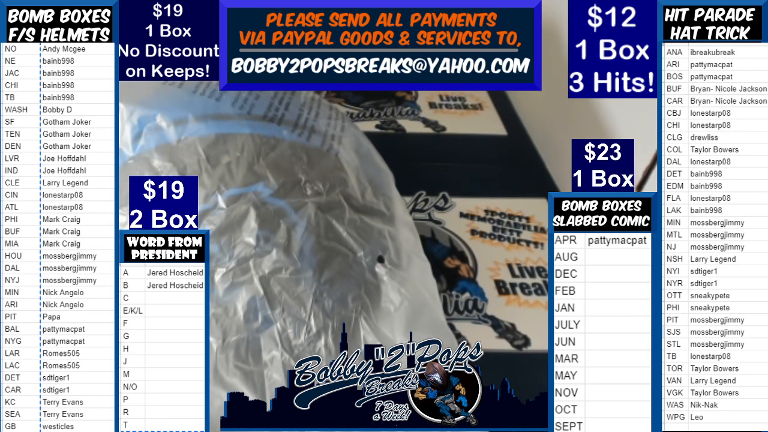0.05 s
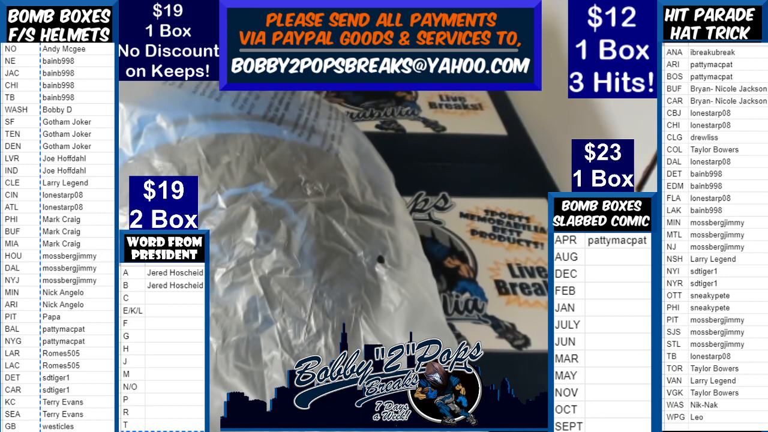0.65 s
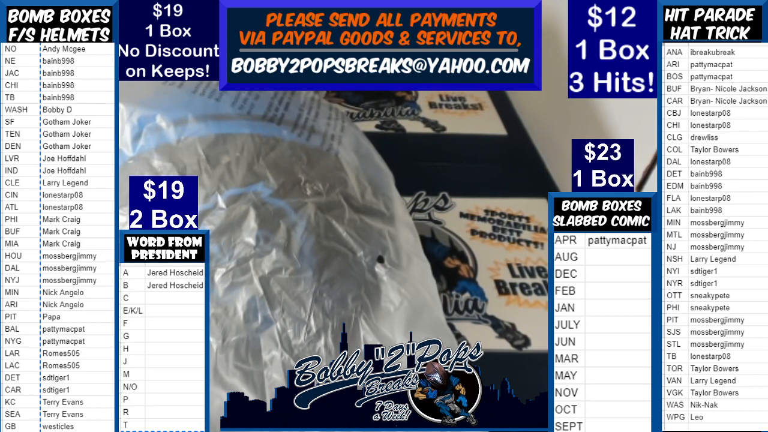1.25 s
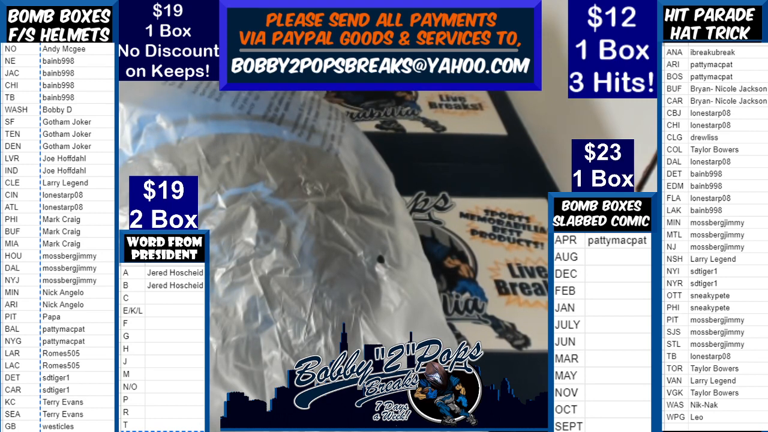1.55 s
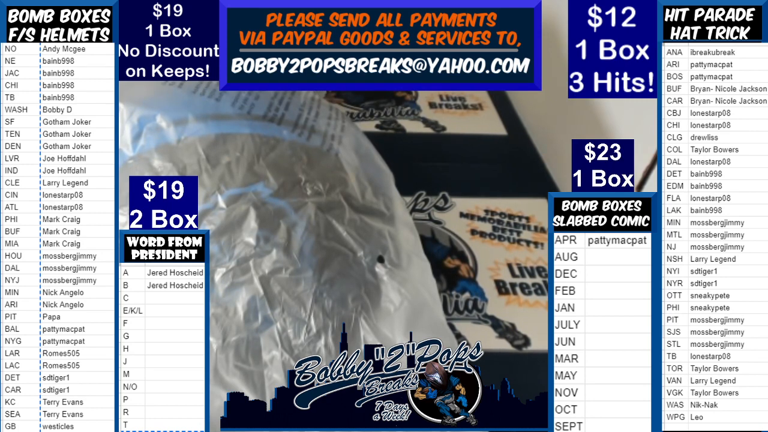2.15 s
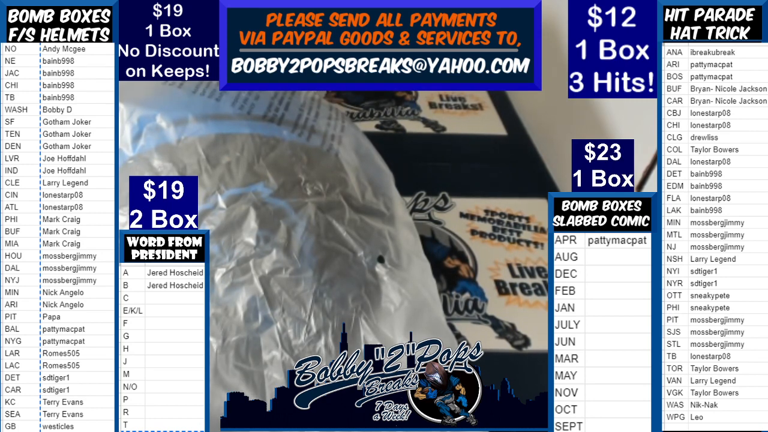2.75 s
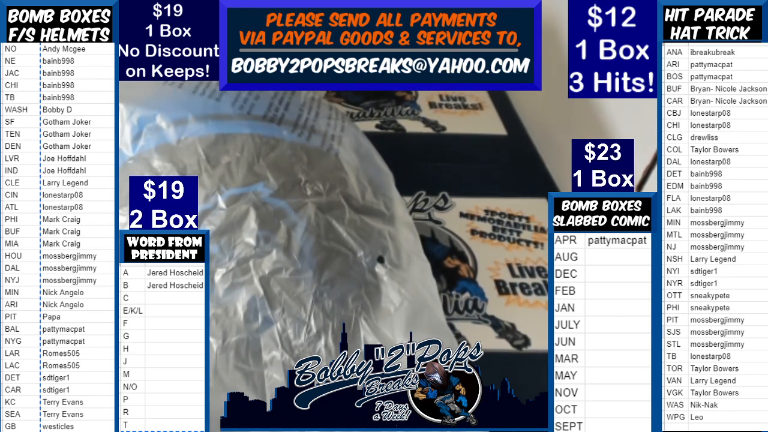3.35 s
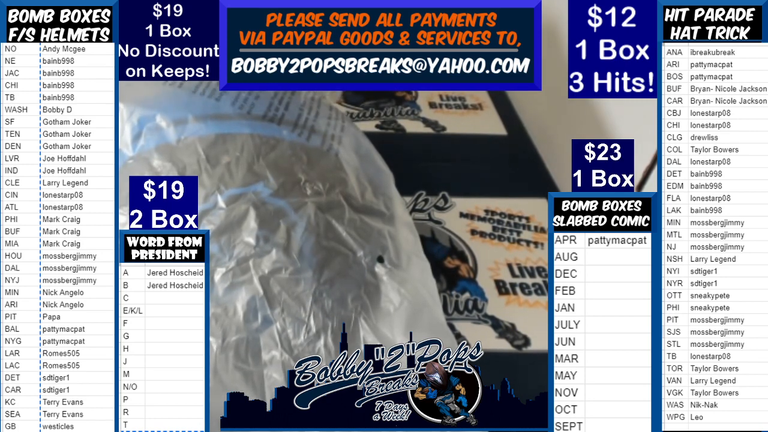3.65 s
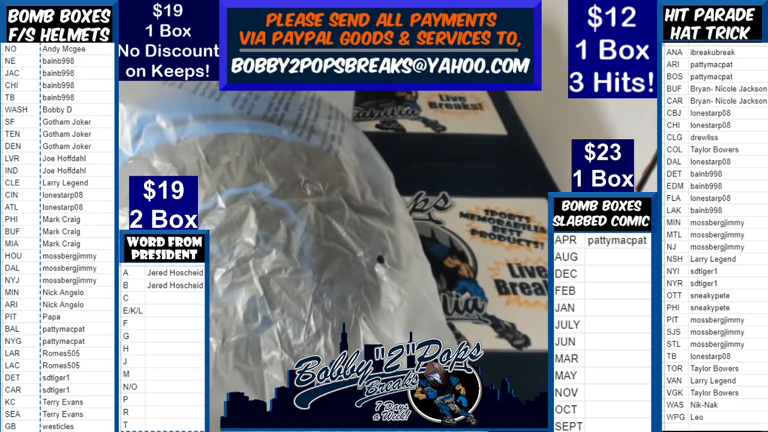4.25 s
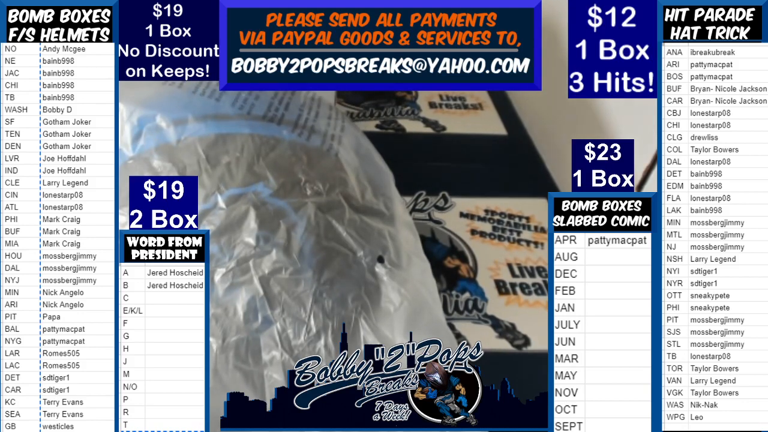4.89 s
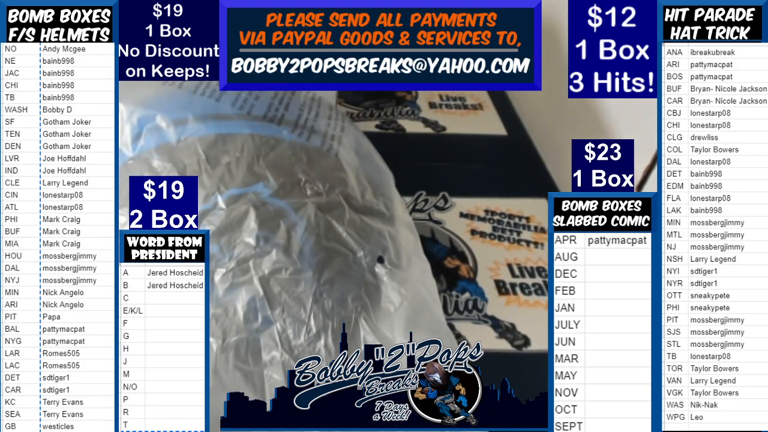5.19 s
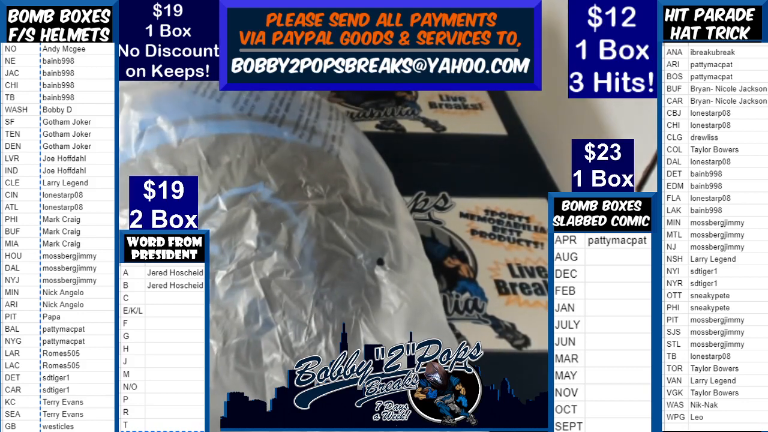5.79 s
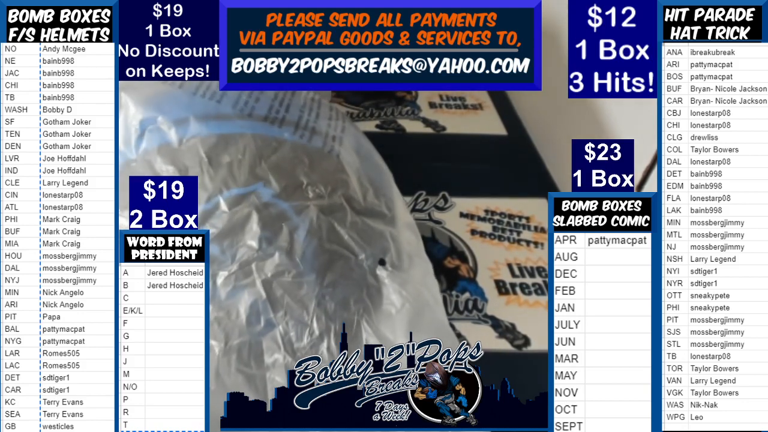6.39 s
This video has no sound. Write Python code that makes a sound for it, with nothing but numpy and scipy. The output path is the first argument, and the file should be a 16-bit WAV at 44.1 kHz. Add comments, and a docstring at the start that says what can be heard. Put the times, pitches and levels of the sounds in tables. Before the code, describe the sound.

Packing tape screeches off the roll in one short, loud, slightly distorted pull. After that, plastic wrap crinkles, snaps and slides in quieter, scattered bursts while a cardboard box is bumped on a desk. Late on come a cluster of sharp cracks, a brief tape twang and a few short scuffs. The microphone is close, in a small room with a faint fan.

```python
"""Taping up a cardboard box

Close to a mono microphone in a small room with a fan, packing tape sticks and slips, screeching
off the roll and overloading the input. Plastic wrap crinkles and slides, its folds buckling in
clicks. The box is bumped and shifted on the desk, ringing its panels; the tape cracks and twangs."""
import sys
import numpy as np
from scipy import signal
from scipy.io import wavfile
from scipy.ndimage import uniform_filter1d

SR = 44100
rng = np.random.default_rng(int(sys.argv[2]) if len(sys.argv) > 2 else 0)


def persist_wave(psi):
    """Save psi, clipped to +-1, as 16-bit WAV."""
    counts = np.round(np.clip(psi, -1, 1) * 32767).astype(np.int16)
    wavfile.write(sys.argv[1], SR, np.atleast_2d(counts).T)


N = 283563
TIME = np.arange(N) / SR


def amp(db):
    """Decibels to gain."""
    return 10 ** (np.asarray(db) / 20)


def unit(x):
    """Scales to rms 1."""
    return x / np.sqrt(np.mean(x ** 2) + 1e-20)


def read(points, hz):
    """Reads a curve on a log-frequency axis."""
    f, value = np.transpose(points)
    return np.interp(np.log(hz + 1), np.log(f + 1), value)


def add(mix, s, sound):
    """Mixes a sound in at time s."""
    part = mix[max(round(s * SR), 0):][:len(sound)]
    part += sound[:len(part)]


def colour(x, points, size=2048):
    """Minimum-phase EQ of energy 1, shaped by (f/Hz, level/dB) points."""
    hz = abs(np.fft.fftfreq(size, 1 / SR))
    log_gain = np.log(amp(np.maximum(read(points, hz), -100)))
    taps = np.fft.ifft(np.exp(np.conj(signal.hilbert(log_gain)))).real
    return signal.fftconvolve(x, taps / np.linalg.norm(taps))


def resonate(x, hz, width):
    """A resonance of gain 1."""
    r = np.exp(-np.pi * width / SR)
    return 2 * signal.lfilter([1 - r], [1, -r * np.exp(2j * np.pi * hz / SR)], x).real


def stroke(s, length, attack_s, release_s):
    """Envelope of one hand movement: it swells up to time s, holds, and dies away."""
    return np.exp(np.minimum((TIME - s) / attack_s, 0) - np.maximum((TIME - s - length) / release_s, 0))


def grains(size, per_s, spread_db):
    """Random tiny clicks, a few much larger than the rest."""
    heights = amp(spread_db * np.minimum(rng.exponential(1, size), 3)) * rng.choice([-1, 1], size)
    return unit(heights * (rng.random(size) < per_s / SR))


# Fan tones: f/Hz, relative level/dB
FAN_TONES = [(226, -78), (382, -70)]
# Dull bed of room noise: f/Hz, level/dB
AIR_EQ = [(30, -7.5), (100, -7.5), (160, -9.5), (240, 0), (500, -4), (750, -4), (1100, -8), (2000, -12),
          (4000, -15.5), (8000, -22), (15000, -35)]


def room_tone(air_db=-57.5, hum_db=5, width_hz=12):
    """Steady room noise with the wavering hum of a fan."""
    noise = rng.standard_normal(N)
    hum = sum(amp(db + hum_db) * unit(resonate(resonate(noise, hz, width_hz), hz, width_hz))
              for hz, db in FAN_TONES)
    return amp(air_db) * unit(colour(rng.standard_normal(N), AIR_EQ)[:N]) + hum


# How hard the tape is pulled: t/s, level/dB
TAPE_PULL = [(0, -16.5), (0.0109, -17), (.013, -4.5), (.026, -4), (.031, -14), (.037, -4.5), (.14, -3.5),
             (.254, -10.5), (.26, -28.5)]
# Ring of the taut strip and the roll: f/Hz, width/Hz, level/dB re the plain slip
STRIP_MODES = [(706, 39, -3.5), (913, 6.7, 0), (1194, 39, -2), (1418, 70, 0.5), (1830, 150, -3),
               (2150, 130, -6.5), (2430, 120, -5), (3820, 43, 0.5), (4026, 60, -5), (4520, 70, -0.5),
               (5020, 70, -2)]
# Bright tone of the screech: f/Hz, level/dB
TAPE_EQ = [(30, -53.5), (70, -29), (140, -21.5), (260, -11.5), (560, -10.5), (690, -2.5), (1030, -4.5),
           (1350, -2), (2500, -1.5), (3400, -3), (4000, -1), (5400, -4), (9000, -6.5), (12000, -17),
           (15000, -22.5)]


def tape_screech(level_db=-2, slips_per_s=1380, full_pull_db=-3.5, jitter=0.55, uneven_db=5):
    """The glue sticks and slips unevenly; each slip flicks the strip and tears a puff of threads."""
    s, pull_db = np.transpose(TAPE_PULL)
    pull = amp(np.interp(TIME, s, pull_db))
    rate = slips_per_s * (pull / amp(full_pull_db)) ** 0.45  # a harder pull raises the pitch
    wobble = unit(uniform_filter1d(rng.standard_normal(N), size=30))
    cycles = np.cumsum(rate * np.exp(jitter * wobble)) / SR
    onsets = np.diff(np.floor(cycles), prepend=0)
    slips = onsets * amp(uneven_db * rng.standard_normal(N)) * rng.choice([-1, 1], N)
    threads = np.exp(-(cycles % 1) / 0.16) * rng.standard_normal(N)
    drive = unit(slips) + unit(threads)
    ringing = drive + sum(amp(db) * resonate(drive, hz, width) for hz, width, db in STRIP_MODES)
    return amp(level_db) * unit(colour(ringing, TAPE_EQ)[:N]) * pull * (TIME <= s[-1])


def fold(drive, treble_db, middle_db, body_db, sizzle_db):
    """Clicks radiate from a piece of film: large stiff pieces have more body, small ones more sizzle."""
    centres_hz = np.array([1050, 2800, 7000, 10700])  # body, middle, treble, sizzle
    widths_hz = np.array([1100, 2900, 5000, 4500])
    power = amp(treble_db + np.array([body_db, middle_db, 0, sizzle_db])) ** 2
    band_db = 10 * np.log10(power / widths_hz / np.max(power / widths_hz))
    eq = [(60, band_db[0] - 30), (400, band_db[0] - 9), *zip(centres_hz, band_db),
          (13000, band_db[-1] - 8), (15000, band_db[-1] - 15)]
    return np.sqrt(power.sum()) * colour(drive / np.linalg.norm(drive), eq)


# Single folds and tape fibres snap: t/s, relative treble/dB, then middle/dB, body/dB, sizzle/dB re treble
SNAP_CUES = [(0.521, -57, 3, -25, -6), (0.597, -32, -1.5, -15, -8), (0.9769, -37, -28, -16.5, -27),
             (1.2768, -51.5, -17, -25, -14), (1.8654, -53, -18, -37, -12), (1.9031, -58.5, -19, -16, 1),
             (2.541, -45, 12.5, 7, -12), (2.9632, -28.5, -16.5, -12, -5), (3.023, -35, -7.5, -7.5, -10),
             (3.252, -36.5, -5.5, 6, -2), (3.4417, -34.5, -14.5, 5, -15), (3.934, -47.5, -8, -13.5, -19),
             (4.515, -25, -3, -2, -3), (4.5596, -22.5, 2.5, 4, -4), (4.5842, -21, 1.5, 4, -5),
             (5.4038, -51, -11, -33, -5.5), (5.5094, -46.5, 3, -20, -6)]


def snaps(level_db=27, creak=0.012, lead_s=0.008, flutter=0.12, settle_s=0.005):
    """The film creaks under strain, cracks once, then settles in a brief flutter."""
    out = np.zeros(N)
    t = (np.arange(1400) - round(lead_s * SR)) / SR
    stir = np.where(t < 0, creak, flutter * np.exp(-abs(t) / settle_s))
    for s, db, *tone in SNAP_CUES:
        crack = (t == 0) + stir * grains(len(t), per_s=9000, spread_db=3.6)
        add(out, s - lead_s, fold(crack, db + level_db, *tone))
    return out


# Hollow ring of the cardboard, before each blow detunes and damps it: f/Hz, level/dB, t60/s
PANEL_MODES = [(65.4, 12.5, 0.091), (88.6, 5, 0.078), (121.8, 1.5, 0.14), (157, -10, 0.11),
               (208.4, 2, 0.12), (235.8, -7, 0.21), (295, -4.5, 0.13), (359.3, -13, .09),
               (420.7, -2, 0.079), (528.5, -12.5, 0.14), (628.5, -12, 0.12)]


def panels(db, deep_db, knock_db, contact_s=0.0039, uneven_db=3, damping=1.1):
    """Soft pushes ring the low modes; hard knocks ring the high ones and leave a finger damping them."""
    t = np.arange(SR // 4) / SR
    hz, mode_db, t60 = np.transpose(PANEL_MODES)
    weight, detune = rng.standard_normal((2, len(hz)))
    tilt_db = read([(120, deep_db), (170, 0), (290, 0), (370, knock_db)], hz)
    blow_db = db + mode_db + tilt_db + uneven_db * weight
    ring_s = t60[:, None] / amp(damping * np.clip(knock_db, -3, 9))
    ring = np.sin(2 * np.pi * np.outer(hz * np.exp(0.05 * detune), t)) * amp(-60 * t / ring_s)
    sides = rng.choice([-1, 1], len(hz))  # a panel may bulge in or out
    return (sides * amp(blow_db)) @ ring * (1 - np.exp(-t / contact_s))


# Thumps on the box: t/s, relative level/dB, deep boost/dB, knock boost/dB
BUMP_CUES = [(0.577, -61, -18, 24), (0.666, -56, -9, -12), (0.967, -39.5, -13, -27),
             (1.383, -40.5, -18, -13), (1.419, -37, -8.5, -3), (1.543, -46.5, -20, -24),
             (1.729, -48, -14, 8), (2.165, -36, -9, 9), (2.537, -39, -14.5, -0.5), (2.75, -54.5, 1, -5),
             (2.821, -54.5, -8, -12), (2.944, -35.5, 3.5, -17), (3.335, -50.5, -8, -2),
             (3.439, -23, -9.5, -1.5), (3.705, -44.5, -6, -14), (3.8, -46, -12.5, -29),
             (4.146, -28, -13.5, 5), (4.228, -43, -15, -7.5), (4.573, -33, -14, -1.5), (4.959, -55, 2, -20),
             (5.52, -58.5, 2, -20), (5.836, -43, -12, 5), (5.979, -44, -15, 6), (6.057, -55.5, 4.5, 4.5),
             (6.386, -55, -22, -7.5)]


def bumps(level_db=7, rock_s=0.026, rock_db=-8, rock_knock_db=-3):
    """The box is bumped and rocks back onto its other edge, softer and duller."""
    out = np.zeros(N)
    for s, db, deep, knock in BUMP_CUES:
        add(out, s, panels(db + level_db, deep, knock))
        add(out, s + rock_s, panels(db + level_db + rock_db, deep, knock + rock_knock_db))
    return out


# Grasps of the wrap: t/s, relative treble/dB, middle/dB, body/dB, sizzle/dB (these three re treble),
# build-up/s, release/s
CRINKLE_CUES = [(0.596, -39, -7.5, -12, -5, 0.026, 0.04), (0.724, -32.5, -5, -18, -8, 0.011, 0.0085),
                (0.99, -41, -14, -10.5, -8.5, .013, 0.017), (1.385, -30.5, -1, -1, -3, 0.0099, .018),
                (1.416, -30.5, 0, 1.5, -9, 0.0027, 0.013), (1.56, -24.5, -7, -17.5, -2.5, 0.014, 0.0095),
                (1.7324, -31.5, -6, -9.5, -1, .004, 0.01), (2.174, -36.5, 0.5, 0.5, -4.5, 0.012, .019),
                (2.4064, -47, -3, -22, -10.5, 0.0064, 0.0098), (2.758, -54.5, -1, -9, -4, 0.0082, 0.0055),
                (2.845, -48.5, -1, 2, -18, 0.0052, 0.011), (3.474, -28, -4, -10.5, -3.5, .01, 0.0092),
                (3.718, -40, -6, -17, -4.5, .011, 0.016), (3.867, -50, -6, -12, -7, 0.0051, .0085),
                (4.156, -44, -1.5, 3, -5.5, 0.0086, 0.042), (4.489, -35.5, 2, -12, -1.5, 0.0045, .008),
                (4.8971, -37, 3.5, -7, -2.5, 0.0059, 0.0064), (5.137, -52, -5, 6, 3.5, 0.011, .0085),
                (5.513, -40.5, -3, -15.5, -6.5, 0.023, 0.047), (5.66, -52, -8, -13.5, 4, 0.019, 0.009),
                (5.8358, -41, -3, -6, -4, .011, 0.011), (6.059, -51.5, -8, 3.5, 6.5, 0.0027, 0.027),
                (6.188, -49.5, 0.5, -2.5, 4.5, 0.026, 0.013), (6.2577, -49.5, -3, -3.5, -2, 0.0075, 0.0064)]


def crinkles(level_db=1, per_s=4000, spread_db=6.5, head_start=1.8, creak=0.63):
    """One fold gives way and sets off a growing avalanche, which dies out as the strain is released."""
    out, t = np.zeros(N), np.arange(-0.1, 0.2, 1 / SR)
    for s, db, *tone, build_s, release_s in CRINKLE_CUES:
        strain = np.exp(np.minimum(t / build_s, -t / release_s))
        first_fold_s = t[np.argmin(abs(t + head_start * build_s))]
        drive = grains(len(t), per_s, spread_db) * strain * np.where(t < first_fold_s, creak, 1)
        drive += np.sqrt(SR / per_s) * (t == first_fold_s)
        add(out, s + t[0], np.linalg.norm(strain) * fold(drive, db + level_db, *tone))
    return out


def ticks(softer_db=-31, wait_s=0.13, scatter_s=0.13, settle_s=0.016):
    """A moment after each snap or grasp, a crease relaxes by itself with a faint tick."""
    out, t = np.zeros(N), np.arange(SR // 30) / SR
    relax = np.exp(-t / settle_s)
    for s, db, *_ in SNAP_CUES + CRINKLE_CUES:
        drive = grains(len(t), per_s=5000, spread_db=3) * relax
        tick = fold(drive, db + softer_db, middle_db=-6, body_db=-14, sizzle_db=-10)
        add(out, s + wait_s + scatter_s * rng.random(), np.linalg.norm(relax) * tick)
    return out


# The wrap slides: t/s, length/s, relative level/dB
SLIDE_CUES = [(1.207, 0.14, -65.5), (2.739, 0.099, -57.5), (3.128, 0.59, -53.5), (3.709, 0.094, -49),
              (4.104, 0.53, -65), (4.993, 0.34, -65.5), (5.598, 0.19, -62), (6.082, 0.11, -67)]
# Its thin hiss: f/Hz, level/dB
SLIDE_EQ = [(1000, -20), (2500, -11.5), (4200, -18), (5300, -4), (6500, -5), (9000, -5.5), (11500, -14),
            (13000, -24), (15000, -33)]


def slides(level_db=1, per_s=12000, spread_db=3, attack_s=0.017, release_s=0.024):
    """Film rubs on film with a fine, high fizz."""
    speed = sum(amp(db) * stroke(s, length, attack_s, release_s) for s, length, db in SLIDE_CUES)
    return amp(level_db) * speed * unit(colour(grains(N, per_s, spread_db), SLIDE_EQ)[:N])


# The hand squeezes the wrap: t/s, length/s, level/dB
SQUEEZE_CUES = [(1.286, 0.025, -55.5), (1.762, .015, -57), (2.765, 0.14, -55), (2.946, 0.093, -41),
                (3.71, 0.038, -59), (4.456, 0.054, -53), (4.6, 0.04, -38)]
# Its full crunch: f/Hz, level/dB
CRUMPLE_EQ = [(300, -28.5), (800, 0), (1400, -4), (2700, 0), (4500, -4.5), (9000, -5.5), (12000, -25),
              (15000, -40)]


def squeezes(per_s=3500, spread_db=11, patchy_db=4, attack_s=0.008, release_s=0.017):
    """Small creases crumple densely; larger pockets of film change shape, so their resonances shift."""
    creases = colour(grains(N, per_s, spread_db), CRUMPLE_EQ)[:N]
    hz, _, bands = signal.stft(creases, nperseg=256)
    pockets = uniform_filter1d(rng.standard_normal(bands.shape), size=3, axis=0)
    pockets = unit(uniform_filter1d(pockets, size=9, axis=1))
    pockets /= 1 + (hz[:, None] / 4500) ** 4  # the top end stays even
    crumple = unit(signal.istft(bands * amp(patchy_db * pockets), nperseg=256)[1][:N])
    grip = sum(amp(db) * stroke(s, length, attack_s, release_s) for s, length, db in SQUEEZE_CUES)
    return crumple * grip


# The box shifts on the desk: t/s, length/s, relative level/dB, edge/dB re that level
SCUFF_CUES = [(4.432, 0.011, -47, -7.5), (4.98, 0.0054, -52, -20), (5.14, 0.065, -41.5, -4),
              (5.833, 0.0076, -29, -15), (5.977, 0.03, -42, -26)]
# Dull drag of cardboard: f/Hz, level/dB
DRAG_EQ = [(100, -36), (250, -19), (400, -11), (520, -2), (750, 0), (950, -3), (1450, 0), (2100, -7),
           (2600, -22), (4000, -50)]
# Rasp of a sharp edge: f/Hz, level/dB
RASP_EQ = [(1500, -16), (2300, 2), (3000, -3.5), (4100, -3)]


def scuffs(level_db=-1, per_s=2500, spread_db=3, attack_s=0.0081, release_s=0.0059):
    """Cardboard catches on the desk in small jerks; a sharp edge adds rasp."""
    out = np.zeros(N)
    lowpass = signal.butter(10, 4000, fs=SR, output="sos")
    jerks = signal.sosfilt(lowpass, grains(N, per_s, spread_db))
    drag = unit(colour(jerks, DRAG_EQ)[:N])
    rasp = unit(colour(jerks, RASP_EQ)[:N])
    for s, length, db, edge_db in SCUFF_CUES:
        out += amp(db + level_db) * (drag + amp(edge_db) * rasp) * stroke(s, length, attack_s, release_s)
    return out


# The tape twangs: t/s, level/dB, f/Hz, half-width/Hz, t60/s
TWANG_CUES = [(4.892, -27, 3130, 140, 0.08), (5.013, -48.5, 1228, 150, .3)]


def twangs(rise_s=0.0037):
    """A plucked strip swells and buzzes briefly around one pitch."""
    out, t = np.zeros(N), np.arange(SR // 5) / SR
    for s, db, hz, half_width, t60 in TWANG_CUES:
        band = signal.butter(3, [hz - half_width, hz + half_width], "band", fs=SR, output="sos")
        buzz = unit(signal.sosfilt(band, rng.standard_normal(len(t))))
        add(out, s, buzz * amp(db - 60 * t / t60) * (1 - np.exp(-t / rise_s)))
    return out


# Small-room decay, before the tail is gated: f/Hz, t60/s
WALL_DECAY = [(150, 0.11), (500, 0.23), (1200, 0.23), (3000, .26), (7000, 0.2), (14000, 0.29)]


def echo(desk_db, walls_db, reach_s, desk_fade_s=0.0037, absorbed_hz=30000):
    """Quick slap off desk and box, then a wall tail gated near reach_s, sooner in the treble."""
    t = np.arange(SR // 4) / SR
    desk = grains(len(t), per_s=4000, spread_db=1) * np.exp(-t / desk_fade_s) * (t > 0.0005)
    bounces = grains(len(t), per_s=5000, spread_db=1) * (t > 0.006)
    hz, delay_s, bands = signal.stft(bounces, SR, nperseg=256)
    bands /= 1 + (delay_s / reach_s * (1 + hz[:, None] / absorbed_hz)) ** 8
    decay = amp(-60 * delay_s / read(WALL_DECAY, hz)[:, None])
    walls = signal.istft(bands * decay, SR, nperseg=256)[1][:len(t)]
    return amp(desk_db) * desk / np.linalg.norm(desk) + amp(walls_db) * walls / np.linalg.norm(walls)


def room(x, desk_db, walls_db, reach_s, spots=8, cycle_hz=11):
    """The sounding spot keeps moving, so the sound crossfades from one set of reflections to the next."""
    offset = (TIME * cycle_hz - np.arange(spots)[:, None] / spots + 0.5) % 1 - 0.5
    shares = np.sin(np.pi / 2 * np.maximum(1 - spots * abs(offset), 0))
    wet = sum(signal.oaconvolve(x * share, echo(desk_db, walls_db, reach_s))[:N] for share in shares)
    return (x + wet) / np.sqrt(1 + amp(desk_db) ** 2 + amp(walls_db) ** 2)


def scene():
    """Everything reaches one microphone, heard alike in both ears."""
    plastic = snaps() + crinkles() + ticks() + squeezes() + slides()
    plastic = room(plastic, desk_db=0.5, walls_db=-2.5, reach_s=0.095)
    box = room(bumps() + scuffs() + twangs(), desk_db=-5.5, walls_db=-6, reach_s=0.051)
    screech = room(tape_screech(), desk_db=-2.5, walls_db=-1.5, reach_s=0.17)
    mono = screech + plastic + box + room_tone()
    return np.array([mono, mono])


def suppress_noise(x, depth_db=-7, margin_db=9):
    """Bands that sink towards their own floor are turned down, which cuts the tails short."""
    bands = signal.stft(x, nperseg=512)[2]
    power = uniform_filter1d(abs(bands) ** 2, size=15, axis=1)
    power = abs(uniform_filter1d(power, size=3, axis=2))
    threshold = np.percentile(power, 15, axis=2, keepdims=True) * amp(margin_db) ** 2
    excess = (power / (threshold + 1e-20)) ** 2
    gain = (excess + amp(depth_db)) / (excess + 1)
    return signal.istft(bands * gain, nperseg=512)[1][:, :N]


def record(dry, ceiling=0.65, knee=6, rumble_hz=150, top_hz=15250):
    """The input overloads on the loudest sounds; then a rumble filter, the suppressor and a high cut."""
    clipped = dry / (1 + abs(dry / ceiling) ** knee) ** (1 / knee)
    thinned = signal.lfilter(*signal.butter(2, rumble_hz, "high", fs=SR), clipped)
    high_cut = signal.firwin(511, top_hz, window=("kaiser", 9), fs=SR)
    return signal.oaconvolve(suppress_noise(thinned), high_cut[None], "same")


dry = scene()
out = record(dry)
persist_wave(out)
```